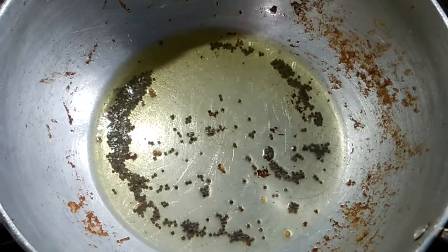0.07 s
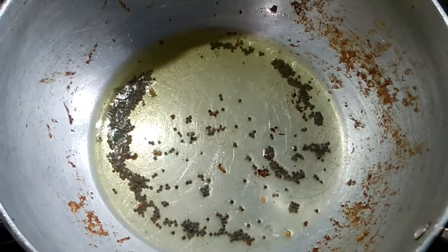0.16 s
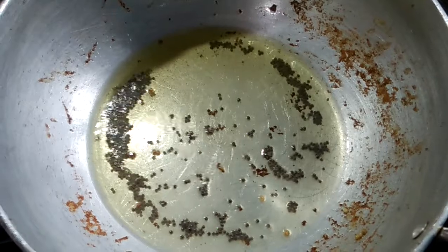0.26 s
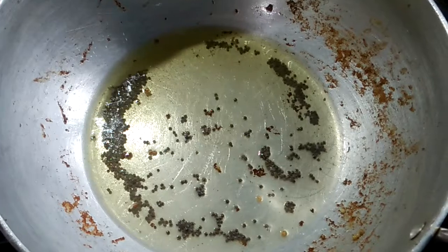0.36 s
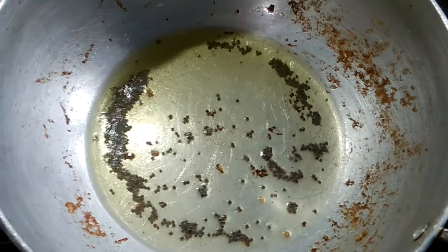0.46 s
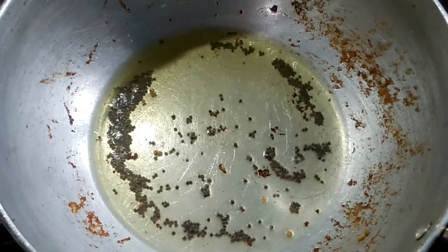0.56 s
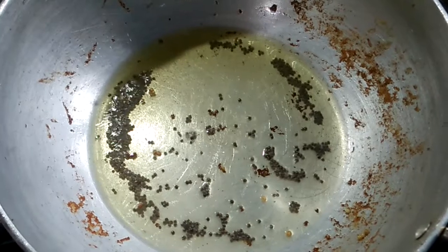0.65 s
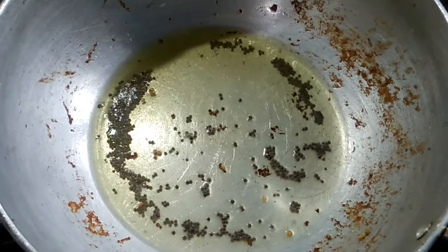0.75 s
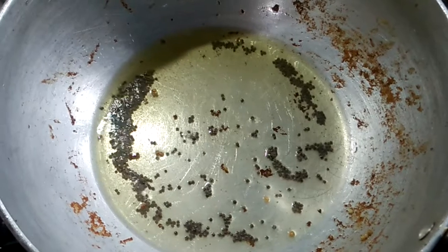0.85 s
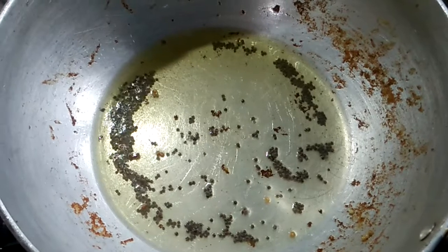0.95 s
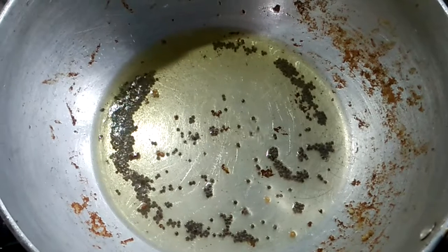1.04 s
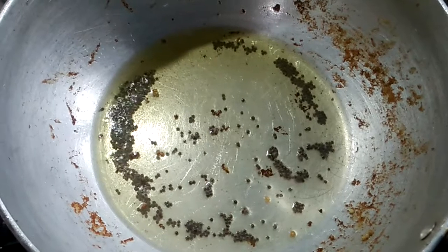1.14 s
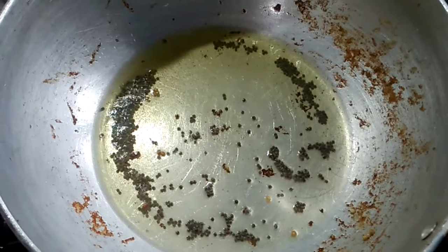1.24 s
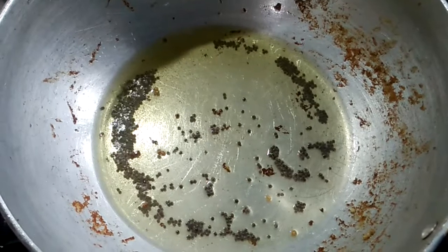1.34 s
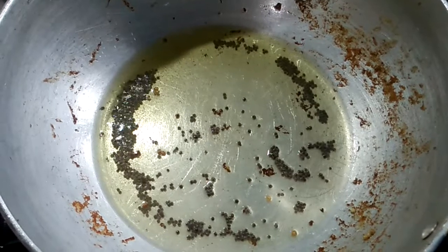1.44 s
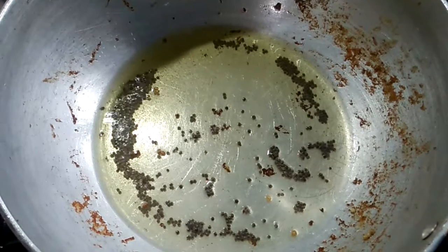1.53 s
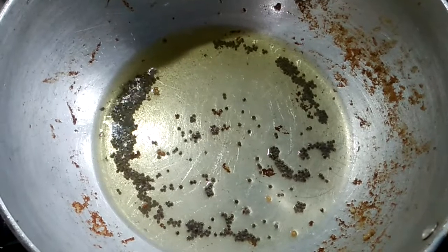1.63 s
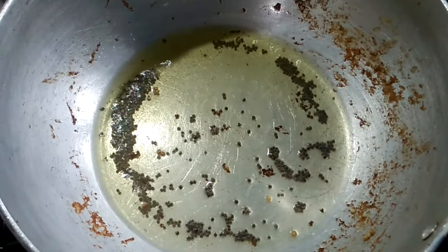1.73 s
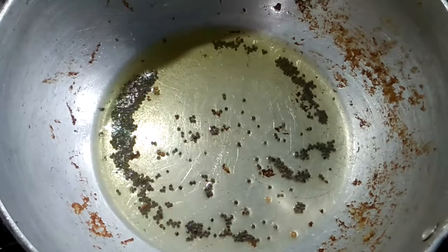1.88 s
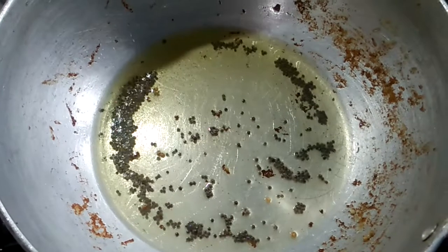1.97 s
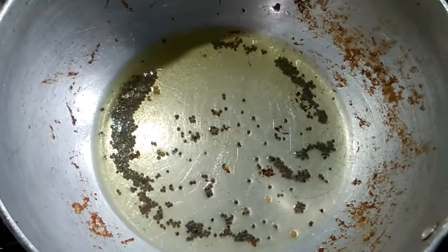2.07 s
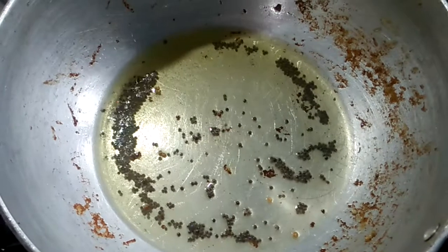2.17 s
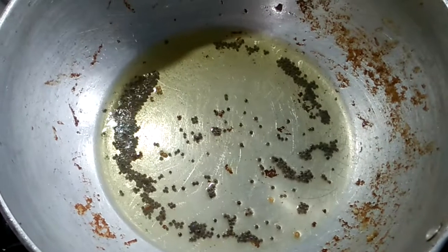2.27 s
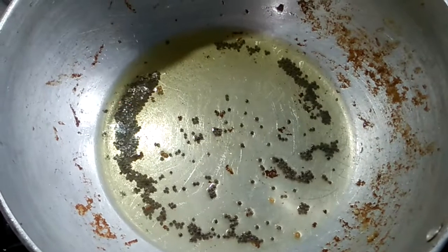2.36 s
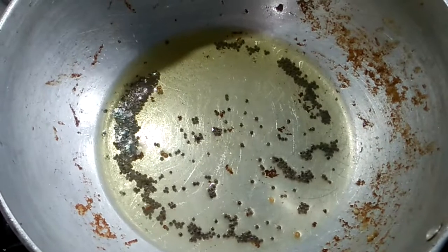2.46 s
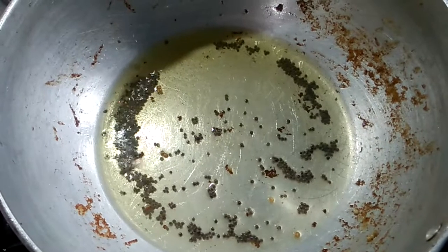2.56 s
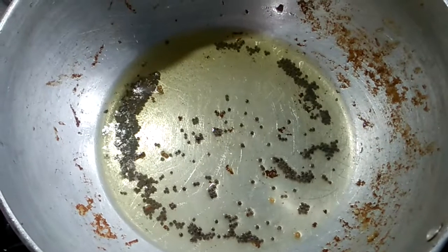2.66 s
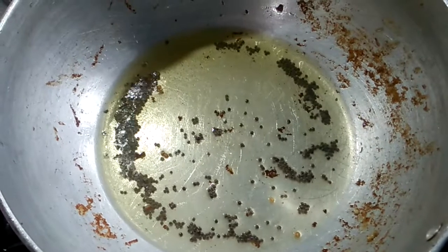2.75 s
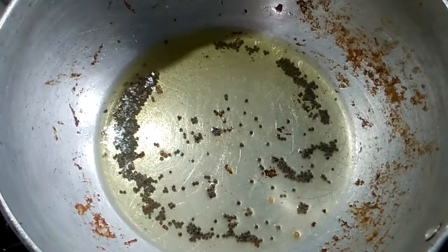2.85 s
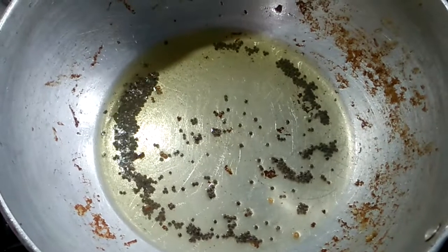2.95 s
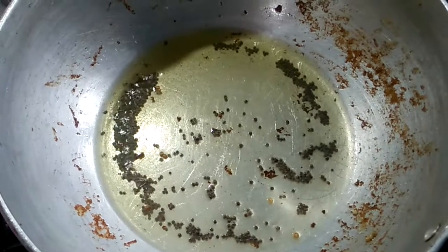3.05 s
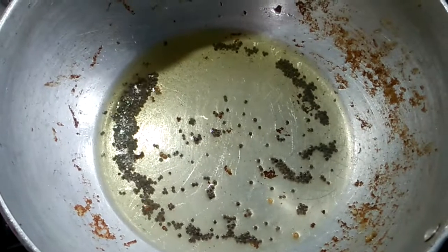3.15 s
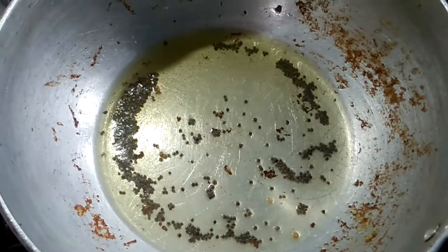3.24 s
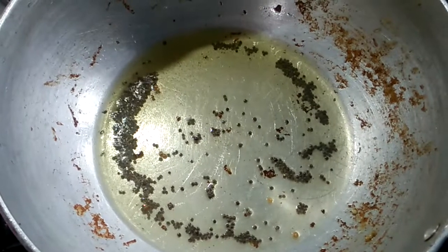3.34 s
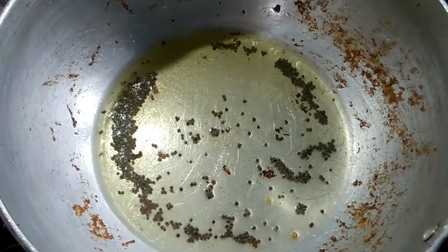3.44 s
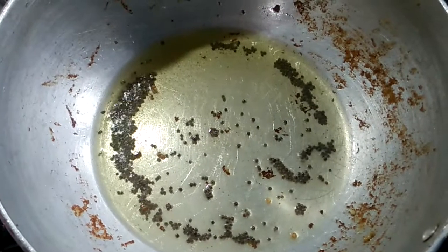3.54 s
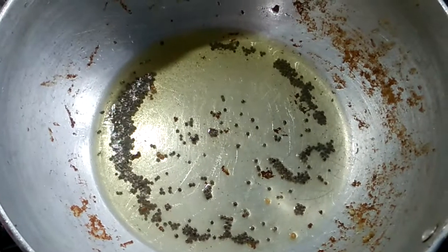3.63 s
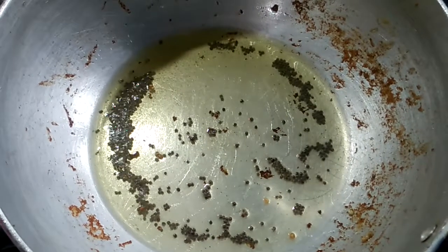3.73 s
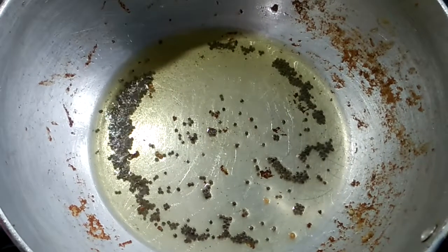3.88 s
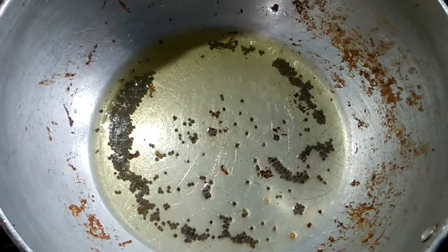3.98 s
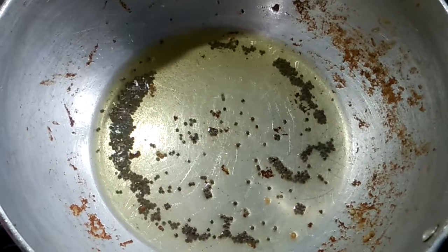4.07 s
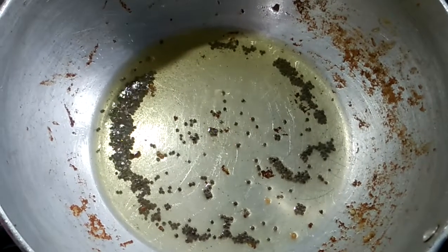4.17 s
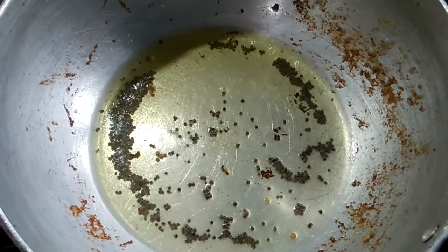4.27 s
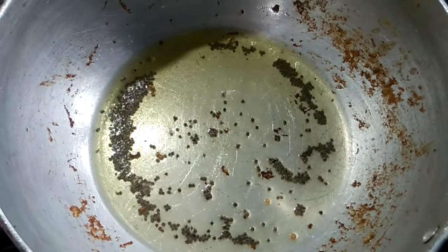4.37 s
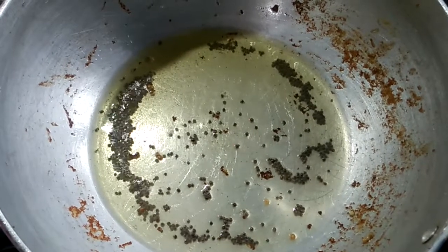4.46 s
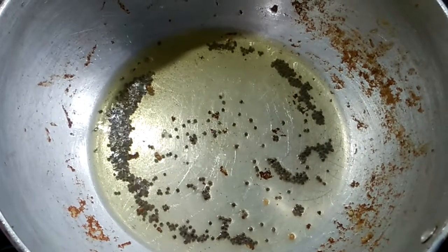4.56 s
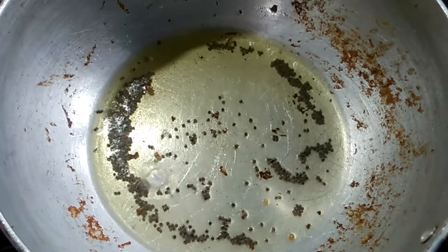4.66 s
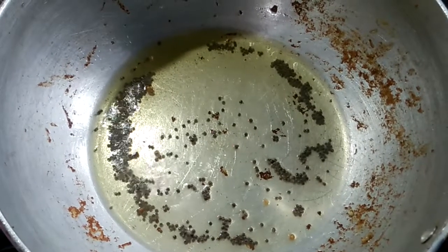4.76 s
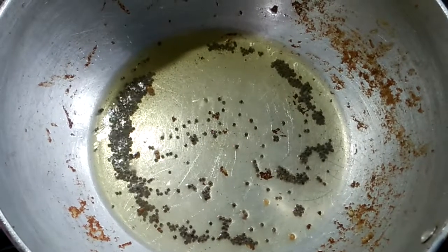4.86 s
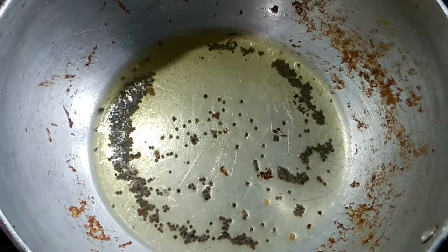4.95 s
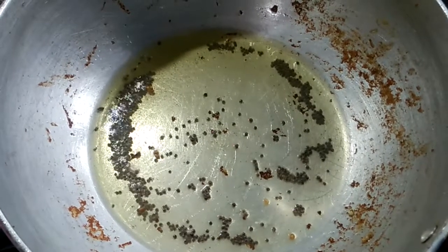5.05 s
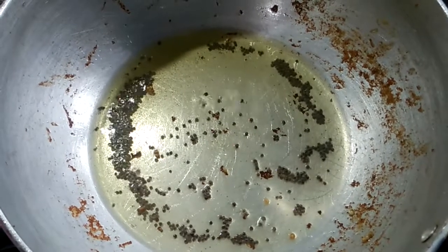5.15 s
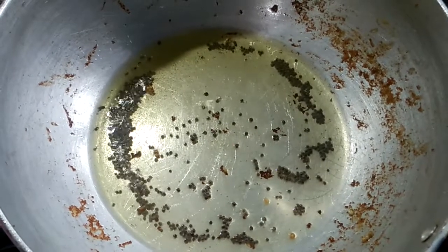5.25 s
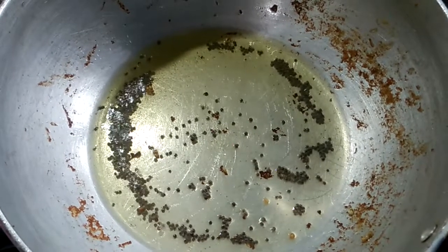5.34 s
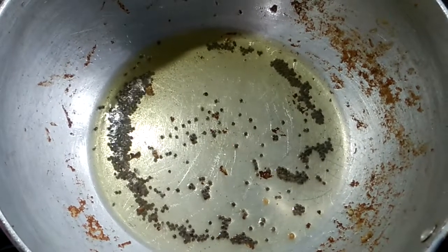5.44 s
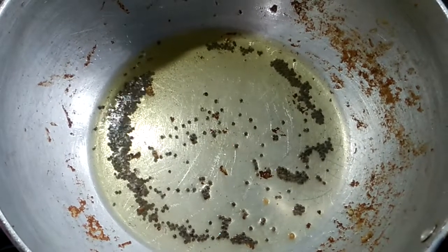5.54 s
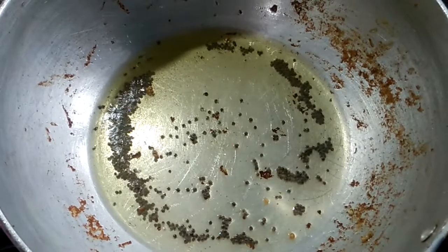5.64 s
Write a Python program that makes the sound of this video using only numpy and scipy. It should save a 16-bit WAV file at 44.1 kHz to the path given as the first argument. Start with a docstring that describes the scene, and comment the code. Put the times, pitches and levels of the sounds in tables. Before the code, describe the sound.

Sparse, sharp husk pops and tiny bubble blips sound in a metal pan, heard from very near with tight pan reflections and a short kitchen echo. Clusters early on give way to isolated cracks, strong ones around two and two and a half seconds, then a quieter gap and a busy crackling run after four seconds. Fine uneven hiss, a faintly singing simmer and quiet low hum lie underneath.

```python
"""A kitchen, heard from just above a steel pan where seeds splutter in a little hot oil.
Husks burst as dry snaps (clicks and torn noise); steam bubbles plip as short, sliding tones and squeal as
narrow whistles. Each rings the pan and echoes off a near wall, made by mixing in echoes and ringing tones.
Underneath lie a fine sizzle of random ticks and hiss whose level rises and sinks, a murmuring, singing simmer
of small ringing bubbles and whistles, and the room's low rumble and hum of filtered noise."""
import sys
import numpy as np
from scipy import signal
from scipy.fft import rfft, irfft, next_fast_len
from scipy.io import wavfile

SR = 44100
rng = np.random.default_rng(int(sys.argv[2]) if len(sys.argv) > 2 else 0)


def pcm_store(signal):
    """Save signal as 16-bit PCM."""
    levels = np.round(np.clip(np.atleast_2d(signal), -1, 1) * 32767)
    wavfile.write(sys.argv[1], SR, levels.astype(np.int16).T)


N = 251722   # length in samples
TIME = np.arange(N) / SR   # seconds from the start of the scene
AGE = TIME[:SR * 3 // 4]   # seconds since one short event began

# Stretches in which the sizzle is loud; between them it sinks away.
# Each row: start in seconds, length in seconds, level in dB.
SIZZLE_SPELLS = [(-.02, 0.041, -58), (0.124, 0.34, -70.5), (.52, 0.06, -68), (0.675, 0.61, -67),
                 (1.419, .12, -69), (1.788, .15, -69.5), (2.288, .16, -69), (2.499, .47, -62.5),
                 (3.05, 0.73, -64.5), (3.95, .05, -78.5), (4.231, .2, -64), (4.44, 0.94, -61.5),
                 (5.451, 0.14, -66.5)]


def from_db(db):
    """Turn decibels into a gain."""
    return 10 ** (np.asarray(db) / 20)


def rms_one(x):
    """Scale to an average strength (rms) of 1."""
    return x / np.sqrt(np.mean(x ** 2) + 1e-20)


def energy_one(x):
    """Scale a short sound to the energy of a one-sample click of height 1."""
    return x / np.sqrt(np.sum(x ** 2) + 1e-20)


def cut(x, hz, kind, order=2):
    """Butterworth filter: "low" keeps what lies below hz, "high" what lies above."""
    sections = signal.butter(order, min(hz, 0.45 * SR), kind, fs=SR, output="sos")
    return signal.sosfilt(sections, x + 1e-18)


def lift(x, hz, q, db):
    """A bell-shaped boost around one frequency, or a dip if db is negative."""
    w = 2 * np.pi * min(hz, 0.45 * SR) / SR
    a = from_db(db / 2)
    k = np.sin(w) / (2 * q)
    zeros = [1 + k * a, -2 * np.cos(w), 1 - k * a]
    poles = [1 + k / a, -2 * np.cos(w), 1 - k / a]
    return signal.lfilter(zeros, poles, x + 1e-18)


def linger(x, hz, q):
    """An all-pass filter: sound near one frequency comes out a little late, equally loud."""
    w = 2 * np.pi * hz / SR
    k = np.sin(w) / (2 * q)
    poles = [1 + k, -2 * np.cos(w), 1 - k]
    return signal.lfilter(poles[::-1], poles, x)


def coloured(x, spectrum):
    """Filter a steady sound by a curve of gain over frequency, silent outside it; rms 1."""
    hz, db = np.transpose(spectrum)
    size = next_fast_len(N)
    bins = np.maximum(np.arange(size // 2 + 1) * SR / size, 1)
    gain = from_db(np.interp(np.log(bins), np.log(hz), db, left=-120, right=-120))
    return rms_one(irfft(rfft(x, size) * gain, size)[..., :N])


def wavering(pitch_hz, width_hz):
    """A noisy whistle: two slow noises steer the strength and phase of a tone; rms 1."""
    a, b = cut(rng.standard_normal((2, N)), width_hz / 2, "low")
    phase = 2 * np.pi * np.cumsum(pitch_hz * np.ones(N)) / SR
    return rms_one(a * np.cos(phase) + b * np.sin(phase))


def flutter(rate_hz, depth_db):
    """A gain that wanders at random, no faster than about rate_hz."""
    wander = cut(rng.standard_normal(N + SR), rate_hz, "low")[SR:]   # drop the filter's warm-up
    return from_db(depth_db * rms_one(wander))


def add(out, s, sound):
    """Mix a sound in from time s."""
    at = max(round(s * SR), 0)
    out[:, at:at + sound.shape[-1]] += sound[:, :max(N - at, 0)]


def spread(mid, side, side_db=-8.0, low_hz=6400):
    """Two close microphones differ only in the treble of diffuse sound."""
    difference = from_db(side_db) * cut(side, low_hz, "high", order=8)
    return mid + difference * np.array([[1], [-1]])


def scatter(start_s, t60, db, dull_hz, lumpiness=0):
    """Echoes that set in after a delay and fall 60 dB in t60 s, a few standing out if lumpy: mid and side."""
    fade = (AGE >= start_s) * from_db(-60 * np.maximum(AGE - start_s, 0) / t60)
    paths = rng.standard_normal((2, len(AGE)))
    lumpy = paths * np.abs(paths) ** lumpiness
    noise = cut(lumpy * fade, dull_hz, "low", order=1)
    return from_db(db) * np.sqrt(2) * energy_one(noise)


def in_pan(sound, ring_db=-49.0):
    """Every spot in the oil has its own paths: direct, pan sides, near wall, kitchen, and the ringing steel."""
    # The pan's ringing tones. Each row: pitch in Hz, relative level in dB, time to fall 60 dB in seconds.
    pan_tones = [(704, -5, 0.12), (941, 5.5, 0.32), (1373, -2.5, 0.46), (2110, -16.5, .2), (2400, -9, 0.4),
                 (2380, -31, .8), (2880, 1.5, 0.26), (3600, -1, 0.33), (3900, -11, 0.21),
                 (4300, -20.5, 0.071)]
    pan_sides = scatter(0.00031, t60=0.037, db=-4.0, dull_hz=9600, lumpiness=1.0)
    near_wall = scatter(0.0086, t60=0.016, db=-10.0, dull_hz=11500, lumpiness=1.0)
    early = (pan_sides + near_wall)[0]
    early[0] += 1   # the direct path
    late = scatter(0.004, t60=0.18, db=-3.0, dull_hz=10400)
    late += scatter(0.0089, t60=0.52, db=-10.5, dull_hz=7600)
    mid, side = late
    for hz, db, t60 in pan_tones:
        ringing = np.sin(2 * np.pi * (hz * AGE + rng.random())) * from_db(-60 * AGE / t60)
        mid += from_db(ring_db + db + rng.normal(0, 0.93)) * ringing   # each spot rings it a little differently
    return signal.fftconvolve(spread(early + mid, side), sound[None], axes=1)


def spell_db(spells, attack_s=0.017, fade_db_per_s=125, rest_db=-92):
    """Level of a sound that comes and goes: each spell starts quickly, holds, then dies away steadily."""
    power = from_db(rest_db) ** 2   # between spells
    for s, length, db in spells:
        attack = np.clip((TIME - s) / attack_s, 0, 1)
        fade_db = fade_db_per_s * np.maximum(TIME - s - length, 0)
        power = power + (attack * from_db(db - fade_db)) ** 2
    return 10 * np.log10(power)


def room(rumble_mean_db=-71, rumble_follows=0.24):
    """Lumpy low rumble, shaped from noise, with a few unsteady drones."""
    # Colour of the rumble. Each row: frequency in Hz, relative level in dB.
    rumble_colour = [(20, -27.5), (38, 1.5), (55, 6), (72, 9.5), (90, -26.5), (125, -5), (150, -0.5),
                     (200, -13.5), (260, -14), (450, -25)]
    # The drones. Each row: pitch in Hz, width in Hz, relative level in dB.
    drones = [(100.8, 8.4, -1.5), (122, 8, -9.5), (177, 12, -12.5), (195.4, 8.3, -19.5)]
    # How the drones' shared level moves. Each row: time in seconds, relative level in dB.
    drone_level = [(0.0, -60), (0.14, -83), (0.17, -61.5), (0.6, -76.5), (1.11, -69.5), (1.48, -80),
                   (2.0, -65.5), (2.59, -75.5), (3.05, -64), (3.23, -77.5), (3.74, -56.5), (3.94, -79),
                   (3.99, -61.5), (4.26, -80.5), (4.56, -63.5), (5.37, -85.5), (5.53, -68.5), (5.71, -83)]
    level_db = np.interp(TIME, *np.transpose(drone_level))
    swell_db = 9.9 * np.exp(-((TIME - 2.91) / 0.73) ** 2)   # the higher drones swell once, around 2.91 s
    hum = np.zeros(N)
    for hz, width_hz, db in drones:
        hum += from_db(db + swell_db * (hz > 150)) * wavering(hz, width_hz)
    rumble = rms_one(coloured(rng.standard_normal(N), rumble_colour) * flutter(12, depth_db=4.5))
    # the rumble follows a share of the drones' swing
    rumble_db = rumble_mean_db + rumble_follows * (level_db - level_db.mean())
    return from_db(rumble_db) * rumble + from_db(level_db + 1.0) * hum


def sizzle(ticks_per_s=1500, unevenness_db=3.5):
    """Countless tiny bubbles burst around the seeds: random ticks and hiss, coloured by the hollow of the pan."""
    # Overall colour. Each row: frequency in Hz, filter gain in dB.
    sizzle_colour = [(2500, -12.5), (3600, -2), (4900, -8.5), (6100, -2.5), (7600, -2), (10400, -4),
                     (12000, -3), (13600, 2), (15000, -10)]
    # Treble resonances of the spot that sizzles. Each row: frequency in Hz, sharpness Q, boost in dB.
    treble_peaks = [(7260, 20, 5.5), (8200, 25, 5), (9340, 90, 13.5), (11400, 120, 13.5), (11650, 55, 7.5),
                    (12900, 90, -6)]
    sizes = from_db(unevenness_db * np.minimum(rng.exponential(1, N), 5))
    ticks = (rng.random(N) < ticks_per_s / SR) * sizes * rng.choice([-1, 1], N)
    source = rms_one(ticks) + 0.84 * rng.standard_normal(N)
    near = rms_one(in_pan(source)[:, :N])
    diffuse = spread(*rng.standard_normal((2, N)), side_db=-2.0)
    hiss = near + from_db(-4.5) * diffuse
    for hz, q, db in treble_peaks:
        hiss = lift(hiss, hz, q, db)
    return from_db(spell_db(SIZZLE_SPELLS)) * coloured(hiss, sizzle_colour)


def gurgle(per_s=550, cycles=26, unevenness_db=5.0, count=28):
    """A crowd of small bubbles of many sizes, each ringing 60 dB down in a set number of cycles; rms 1."""
    at = rng.integers(0, N, int(per_s * N / SR))
    sizes = from_db(unevenness_db * np.minimum(rng.exponential(1, len(at)), 4))
    out = np.zeros(N)
    pitches = np.geomspace(280, 3000, count) * rng.uniform(0.905, 1.04, count)
    for k, hz in enumerate(pitches):
        births = np.full(N, 1e-18)
        births[at[k::count]] = sizes[k::count] * hz / SR   # every count-th bubble has this pitch
        r = from_db(-60 * hz / (cycles * SR))   # loss per sample
        w = 2 * np.pi * hz / SR
        out += signal.lfilter([np.sin(w), -np.sin(w)], [1, -2 * r * np.cos(w), r * r], births) / w
    return rms_one(out)


def simmer(mean_db=-68, follows=0.13, hiss_db=7.0):
    """Larger bubbles murmur lower down, and steam sings in two wavering bands."""
    # Colour of the murmur. Each row: frequency in Hz, filter gain in dB.
    murmur_colour = [(150, -33), (250, -4.5), (480, -5), (700, -2), (1200, -1), (1800, 0.5), (2600, 1),
                     (3500, -12), (5000, -13), (8000, -23.5), (15000, -37.5)]
    # Stretches in which the singing is loud. Each row: start in seconds, length in seconds, level in dB.
    singing_spells = [(0, 0.95, -76), (2.55, 0.62, -71.5), (3.1, 0.2, -66), (3.42, 0.32, -65),
                      (3.74, .09, -58), (3.95, 0.03, -63.5), (4.38, 0.18, -61.5), (4.85, 0.46, -64.5),
                      (5.45, 0.29, -66)]
    # the murmur follows a share of the sizzle's swing
    sizzle_db = spell_db(SIZZLE_SPELLS)
    murmur_db = mean_db + follows * (sizzle_db - sizzle_db.mean())
    oil = in_pan(gurgle() + from_db(hiss_db) * rng.standard_normal(N))[0, :N]
    murmur = coloured(lift(oil, 1163, q=33, db=8.5), murmur_colour)
    low_band = wavering(2380, 140)
    high_band = wavering(2620, 200) * flutter(7.4, depth_db=2.5)
    singing = rms_one(low_band + high_band)
    return from_db(murmur_db) * murmur + from_db(spell_db(singing_spells)) * singing


def crack():
    """A sudden release of steam: a click without bass, with a knock from the hollow of the pan; the treble leads."""
    click = cut(signal.unit_impulse(SR // 20), 593, "high", order=4)
    click = lift(click, 670, q=4.04, db=8.5)
    return linger(linger(click, 4800, q=1.5), 2710, q=3.8)


def bubbles(rough=0.093, swell=0.045, tick_db=-20.5, knock_db=-19, opening_follows=0.5):
    """A bubble opens with a tick and a knock, then rings briefly, its pitch sliding, mostly up, as it fades."""
    # Steam bubbles. Each row: start in seconds, level of the ringing in dB, first pitch in Hz, slide in octaves.
    plips = [(0.0672, -17, 5440, -0.53), (0.179, -26, 2524, 0.25), (0.661, -18, 2780, 0.52),
             (0.7056, -9, 1643, 0.47), (0.7069, -13.5, 2600, 0.12), (0.917, -31, 2767, 0.26),
             (1.079, -21, 4730, 0.39), (1.4414, -28.5, 1500, 0.18), (1.7605, -43, 4220, 0.098),
             (1.812, -20.5, 2734, 0.73), (2.31, -31.5, 517, 0.19), (2.5454, -22, 2474, 0.43),
             (2.552, -28, 3900, 0.62), (2.6244, -5.5, 2523, .35), (2.634, -19.5, 3380, 0.32),
             (2.7785, -29, 2540, 0.081), (3.296, -36, 3230, .38), (4.295, -34.5, 2630, 0.3),
             (4.453, -38.5, 3840, 0.54), (4.499, -34.5, 3870, 0.22), (4.7532, -14, 1823, 0.5),
             (4.866, -28.5, 2590, 0.27), (4.943, -18.5, 3593, 0.4), (5.4344, -29, 4620, 0.44),
             (5.483, -29, 2470, 0.34)]
    # How long a bubble rings; big, low ones burst almost at once.
    # Each row: first pitch in Hz, life in seconds (time to fall to about a third).
    ring_life = [(1600, 0.0029), (1950, 0.0018), (2500, .0068), (3600, 0.00684), (4600, 0.00413)]
    out, click = np.zeros((2, N)), crack()
    tick = from_db(tick_db) * cut(click, 2800, "high", order=1)
    knock = from_db(knock_db) * cut(click, 1080, "low")
    t = AGE[:len(click)]
    for s, db, first_hz, octaves in plips:
        last_hz = first_hz * 2 ** octaves
        life = np.interp(first_hz, *np.transpose(ring_life))
        left = np.exp(-t / life)   # share of the ringing that is left
        wobble = rms_one(cut(rng.standard_normal(len(t)), 700, "low"))
        pitch = (last_hz + (first_hz - last_hz) * left ** 1.495) * (1 + rough * wobble)
        onset = 1 - np.exp(-t / (swell * life))
        plip = left * onset * np.sin(2 * np.pi * np.cumsum(pitch) / SR)
        plip = energy_one(cut(plip, 0.39 * first_hz, "high"))
        # in dB, the opening follows only a share of the bubble's level
        opening = from_db(opening_follows * db) * (tick + knock)
        add(out, s, in_pan(from_db(db) * plip + opening))
    return out


def snaps(tear_s=0.0017, tear_db=5.5, slope=0.9):
    """Husks split: a fast split is one bright crack, a slow one is duller and tears on for a moment."""
    # Bursting husks. Each row: start in seconds, level in dB before the boost,
    # centre of a broad boost in Hz, size of that boost in dB.
    bursts = [(0.3093, -28, 12700, 17), (0.544, -33.5, 12260, -2.5), (0.6559, -16, 2770, 7),
              (0.7855, -20, 10300, 9), (0.807, -18, 12100, 13), (1.1718, -29.5, 12000, 23.5),
              (1.919, -7, 11700, 0.5), (2.2929, -40.5, 5270, 7.5), (2.4478, -8, 12700, 10.5),
              (2.7340, -33.5, 11300, 15), (3.186, -39, 10600, 16.5), (3.6431, -28, 11800, 18),
              (4.224, -39.5, 6900, 15.5), (4.3653, -26.5, 11850, 16), (4.5367, -28, 5800, 19),
              (4.573, -20.5, 9800, 14.5), (4.663, -48, 9250, 25.5), (4.7155, -19.5, 12600, 19),
              (4.7997, -5, 13350, 12.5), (4.9379, -15.5, 13100, 17.5), (5.2237, -19.5, 8600, 12.5),
              (5.4847, -26, 11900, 2.5), (5.6738, -27, 9900, 11)]
    out, click = np.zeros((2, N)), crack()
    t = AGE[:len(click)]
    for s, db, hz, lift_db in bursts:
        tear = energy_one(cut(rng.standard_normal(len(t)) * np.exp(-t / tear_s), 2200, "high"))
        # the brighter the snap, the less it tears
        split = energy_one(signal.unit_impulse(len(t)) + from_db(tear_db - slope * lift_db) * tear)
        snap = lift(signal.fftconvolve(split, click), hz, q=0.63, db=lift_db)
        add(out, s, from_db(db) * in_pan(snap))
    return out


def squeals(sputter_db=9.0):
    """Thin jets of steam whistle unevenly, most of them gliding slightly upwards."""
    # Steam squeezing out of a husk. Each row: loudest moment in seconds, swell in seconds, fade in seconds,
    # pitch at the loudest moment in Hz, glide in octaves per second, width in Hz, relative level in dB.
    jets = [(1.46, 0.02, 0.023, 6700, .4, 600, -57), (1.474, 0.028, 0.038, 9800, .4, 1600, -60),
            (1.478, 0.034, 0.026, 12600, 0.84, 2500, -65), (2.411, 0.053, 0.02, 2044, 1.4, 190, -48.5),
            (2.41, 0.033, 0.04, 1176, .6, 150, -55.5), (2.986, 0.012, 0.015, 8530, .5, 2200, -55.5),
            (4.97, .02, 0.16, 4225, 0, 29.8, -70.5)]
    out = np.zeros(N)
    for s, swell, fade, hz, glide, width_hz, db in jets:
        t = np.clip(TIME - s, -0.5, 0.5)   # the pitch glides no further than this
        flow = np.exp(-(t / np.where(t < 0, swell, fade)) ** 2)
        out += from_db(db) * flow * wavering(hz * 2 ** (glide * t), width_hz)
    sputter = rms_one(cut(rng.standard_normal(N), 90, "low"))
    out *= from_db(sputter_db * sputter)
    return from_db(-5.5) * in_pan(out)[:, :N]


def scene():
    """Pops and squeals over the frying and the room."""
    return room() + sizzle() + simmer() + bubbles() + snaps() + squeals()


def record(dry):
    """The top is cut steeply, above 14350 Hz."""
    return signal.sosfilt(signal.ellip(10, 0.3, 80, 14350, fs=SR, output="sos"), dry)


dry = scene()
out = record(dry)
pcm_store(out)
```